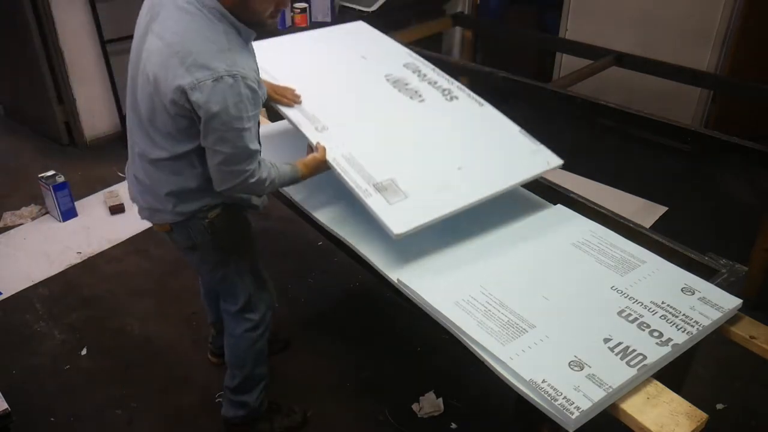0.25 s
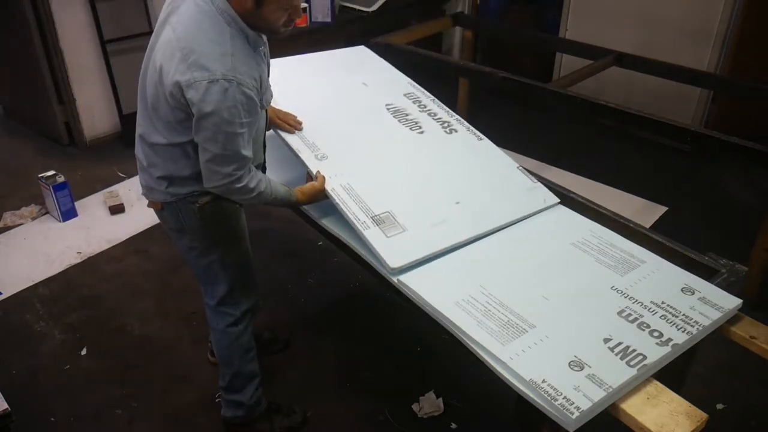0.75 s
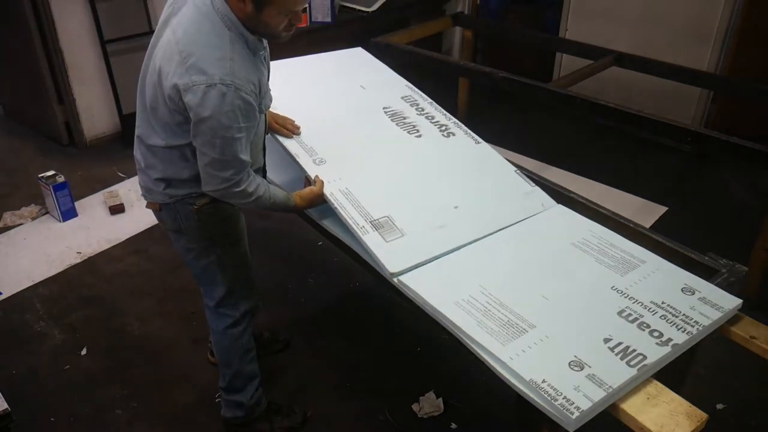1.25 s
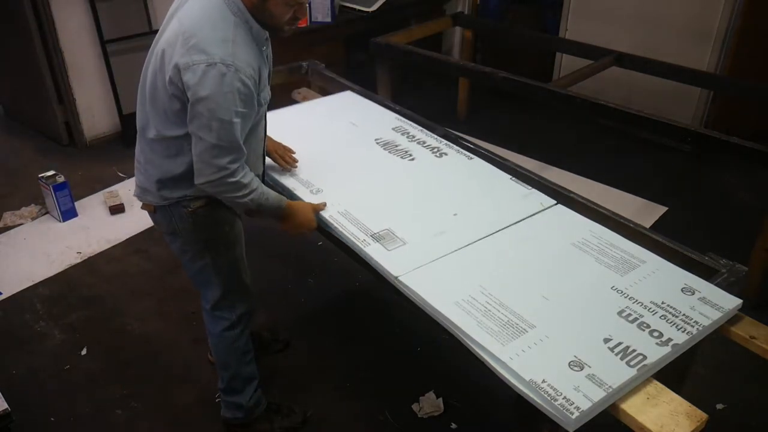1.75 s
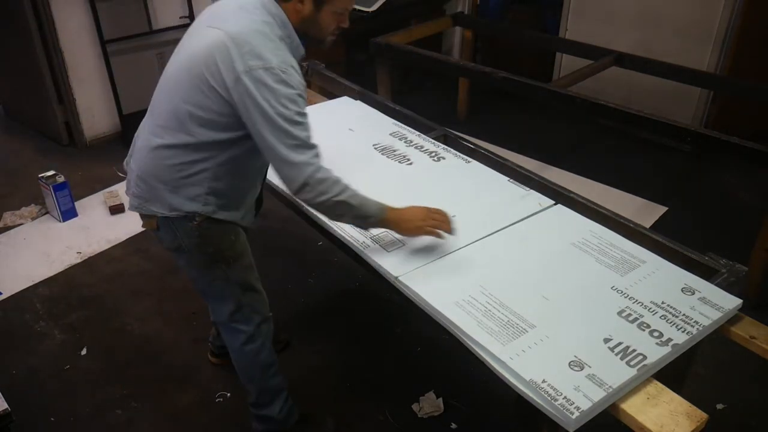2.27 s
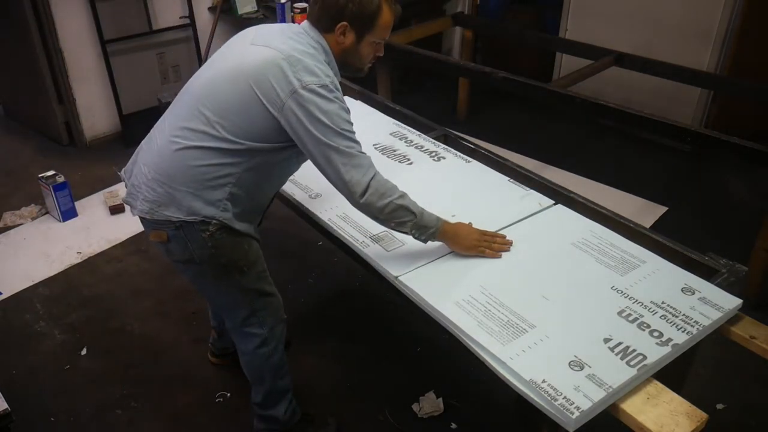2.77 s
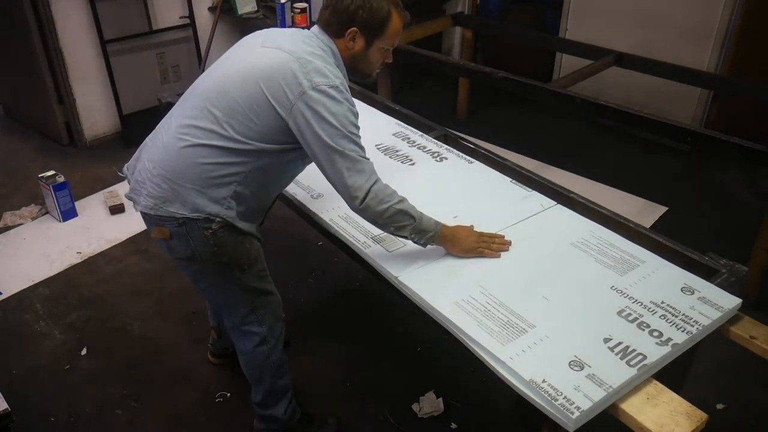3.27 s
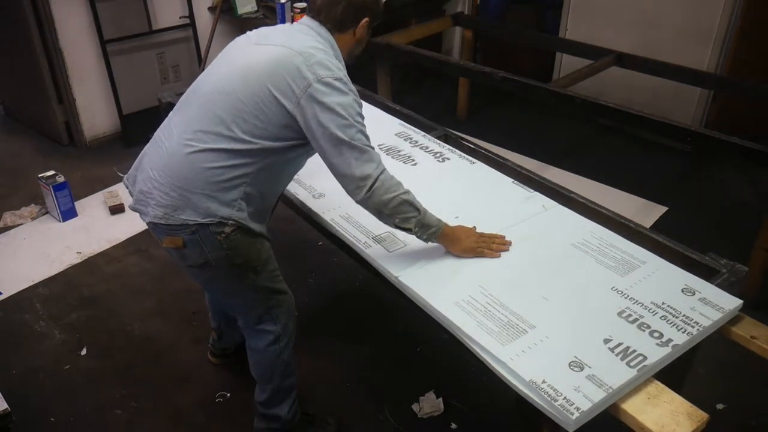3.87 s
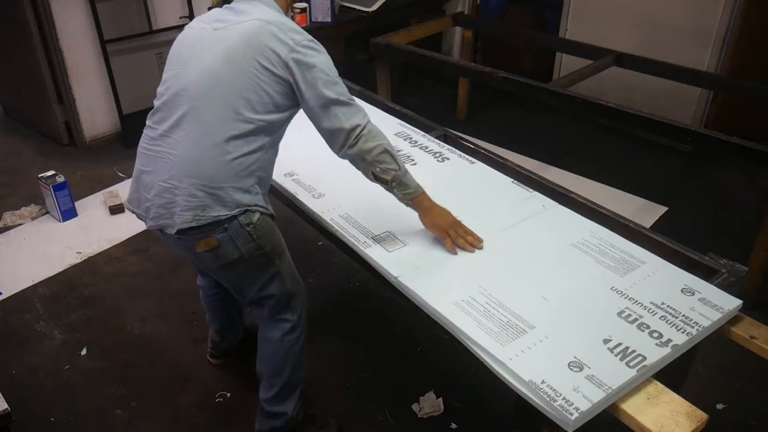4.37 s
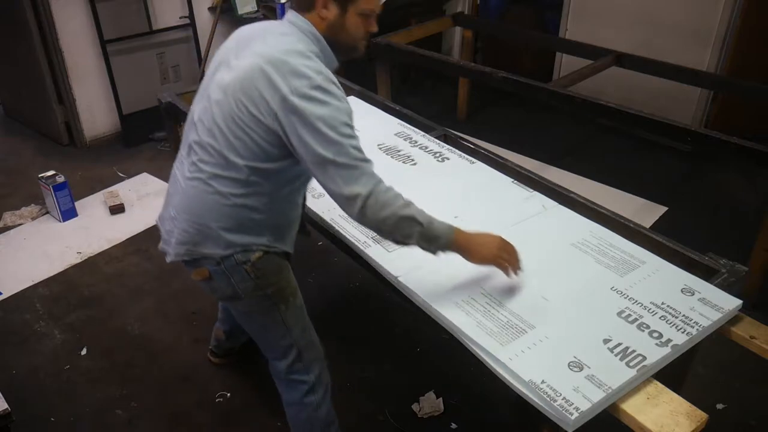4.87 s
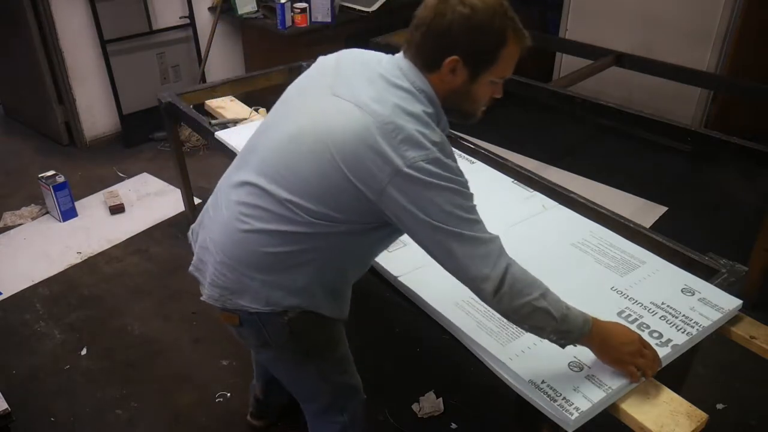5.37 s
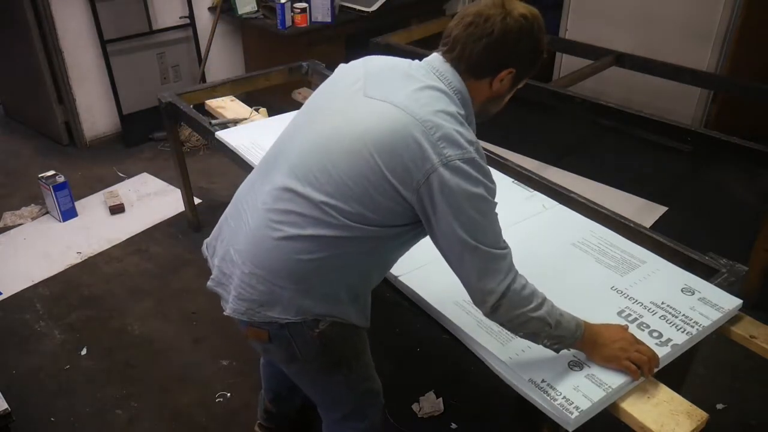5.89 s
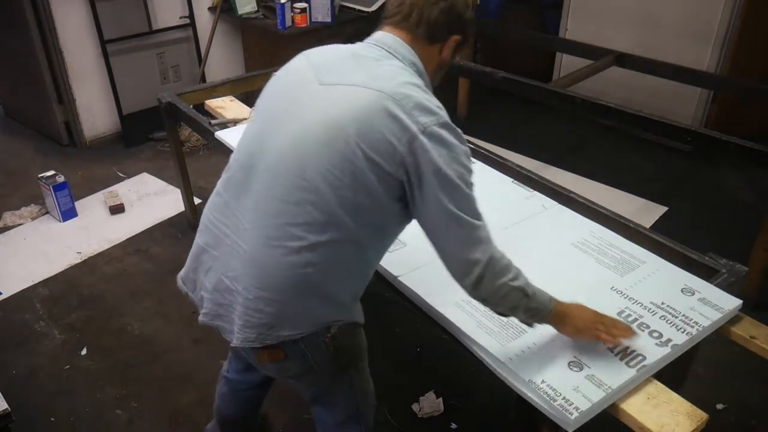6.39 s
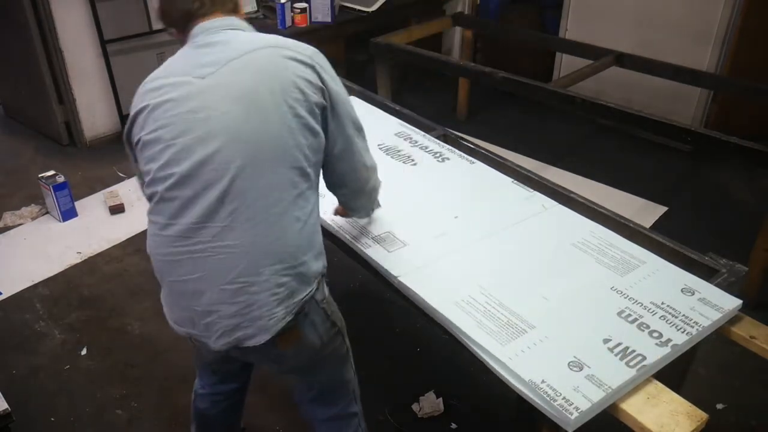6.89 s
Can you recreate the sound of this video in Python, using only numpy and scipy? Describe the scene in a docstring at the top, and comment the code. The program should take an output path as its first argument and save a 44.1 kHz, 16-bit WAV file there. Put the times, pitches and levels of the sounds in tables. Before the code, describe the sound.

A light rigid foam board scrapes and knocks onto another in an echoing workshop, then hand rubs, faint squeaks and a louder sliding bump.

```python
"""In a bare, echoing workshop a rigid foam board is laid on another, slid into place and rubbed by hand.
Grit between the faces slips in tiny jerks: random impulses that ring the resonances of the light panels.
Edges knock and push out trapped air, slips lock into short squeaks, and foam cells snap close by.
Dense echoes follow the board; a mains hum lies on quiet room noise. The two channels are almost the same."""
import sys
import numpy as np
from scipy import signal
from scipy.fft import rfft, irfft
from scipy.io import wavfile

SR = 44100
rng = np.random.default_rng(int(sys.argv[2]) if len(sys.argv) > 2 else 0)


def how_loud(loudness_db):
    """Turn decibels into a plain amplitude multiplier (0 dB gives 1, 20 dB gives 10)."""
    steps = np.asarray(loudness_db, float) / 20
    return 10 ** steps


def bounce(signal):
    """Save signal as a 16-bit WAV file at the path given by the first command-line argument."""
    frames = np.transpose(np.atleast_2d(signal))
    limited = np.clip(frames, -1, 1)
    pcm = np.round(limited * 32767).astype(np.int16)
    wavfile.write(sys.argv[1], SR, pcm)


N = 314874  # length in samples

# edges and palms landing: time_s, force_db, sharpness_db, edge_nearness_db, air_thump_db
KNOCKS = [(0.103, -45, -6, 6, -37.5), (0.557, -58.5, 18, 4, -52), (0.579, -50.5, 14, -17, -40),
          (0.597, -49, 1, -1, -33.5), (0.749, -41.5, -9, 30, -39.5), (0.966, -30, -17, 6, -43),
          (0.992, -43, -8, 4, -36.5), (1.189, -75, -7, -13, -49), (1.4, -44, -11, 3.5, -48),
          (1.696, -39.5, 5.5, -2.5, -40), (1.819, -53, -14, -11, -40.5), (2.064, -38, -21, -0.5, -64),
          (2.17, -31, 5.5, -1.5, -34), (3.923, -57, 6.5, -8, -40.5), (4.331, -57, 6, -1, -39),
          (5.379, -17.5, -29, 6.5, -49), (5.391, -45, -23, 15, -45), (6.23, -46, -2, 3, -50),
          (6.445, -38, 13, 39, -42)]
# rubs that swell and fade: peak_s, swell_s, strength_db, pressure_db, speed_db
RUBS = [(0.04, 0.9, -44.5, 3, 6.5), (0.155, 0.16, -33.5, 2.5, 10.5), (0.24, 0.26, -37.5, -12, -7),
        (0.47, 0.19, -50.5, 13.5, -2), (0.641, 0.23, -46, 9, 0), (0.75, 0.35, -49.5, 3.5, 12),
        (0.87, 0.13, -38.5, -0.5, 17.5), (1.424, 0.34, -47.5, -6, 5), (1.6, 0.22, -62.5, -20, 9),
        (1.701, 0.22, -41.5, 0, 6), (1.8, 0.27, -44, 0.5, 9), (1.896, 0.11, -44.5, -1.5, 10),
        (2.0, 0.22, -50, -6, -3), (2.08, .1, -43.5, -13, -3), (2.24, 0.38, -42.5, 0, 3.5),
        (2.62, 0.12, -50.5, -4, 1), (2.71, 0.22, -47.5, -7, 2), (2.94, 0.084, -58, -2, -7),
        (3.02, .15, -57, -3, 6), (3.24, .15, -61, 3.5, -4), (3.315, 0.2, -51.5, -2.5, 10),
        (3.614, 0.2, -43, -6.5, 3), (3.93, 0.14, -52, 1, 12), (4.035, 0.063, -34.5, 2.5, 4),
        (4.086, 0.21, -32.5, 2, 9), (4.22, 0.16, -48, 4.5, -8), (4.39, 0.61, -37.5, -1.5, 6),
        (4.54, 0.23, -39, 4.5, -5.5), (4.71, 0.17, -56, -2, 7), (4.86, 0.48, -50.5, 3.5, 15),
        (5.045, 0.27, -38, -3, 3.5), (5.2, .35, -26, -7, -6), (5.29, 0.28, -24, -4, -2),
        (5.39, .3, -24, -2.5, -9), (5.7, .2, -51, -2, 1), (6.201, 0.18, -50.5, -6, 5),
        (6.302, 0.13, -39.5, -3.5, 12), (6.798, 0.33, -34, 3, 3.5), (6.9, 0.22, -45, 0, -18),
        (7.13, 0.32, -46, -2.5, 2)]
# scrapes that grip at once: start_s, held_s, strength_db, pressure_db, speed_db
SCRAPES = [(0.101, 0.045, -21.5, 1, -15), (0.577, 0.024, -37.5, -10.5, 7), (0.968, 0.093, -62, 14.5, 4),
           (1.187, 0.018, -46, 4, 5.5), (4.944, 0.027, -42.5, -0.5, 6), (5.063, 0.098, -26.5, -6, -2),
           (6.415, 0.061, -23.5, 0.5, -2.5)]


def rms_one(x):
    """Normalisation: divides a signal by its root mean square."""
    return x / np.sqrt(np.mean(x ** 2) + 1e-20)


def drift(rate_hz):
    """Low-passed noise: two equal poles turn white noise into a slow random course of rms 1."""
    step = 40  # samples between points of the course
    r = np.exp(-2 * np.pi * rate_hz * step / SR)
    white = rng.standard_normal(N // step + 2002)
    slow = signal.lfilter([1], [1, -2 * r, r * r], white)[2000:]
    return np.interp(np.arange(N) / step, np.arange(len(slow)), rms_one(slow))


def coloured(spectrum):
    """Spectral shaping: white noise weighted in frequency by (Hz, dB) points, rms 1."""
    hz = np.arange(1, N // 2 + 2) * SR / N
    at_hz, db = np.transpose(spectrum)
    weight = how_loud(np.interp(np.log(hz), np.log(at_hz), db))
    return rms_one(irfft(rfft(rng.standard_normal(N)) * weight, N))


def resonate(x, modes, low_hz, high_hz):
    """Modal superposition: parallel resonances in a band; white input of rms 1 comes out at rms 1."""
    both = np.array([x + 1e-18, np.arange(N) == 0])  # the signal, and an impulse to find the gain
    band = signal.butter(2, [low_hz, high_hz], "band", fs=SR, output="sos")
    both = signal.sosfilt(band, both)
    out = 0
    for k, (hz, width_hz, db) in enumerate(modes):
        r = np.exp(-np.pi * width_hz / SR)
        poles = [1, -2 * r * np.cos(2 * np.pi * hz / SR), r * r]
        zeros = [(1 - r * r) / 2, 0, (r * r - 1) / 2]
        out = out + (-1) ** k * how_loud(db) * signal.lfilter(zeros, poles, both)
    sounded, response = out
    return sounded / np.sqrt(np.sum(response ** 2))


def background():
    """Stationary noise and a tone: room noise that wavers a little, and a hum at twice the mains rate."""
    # room noise spectrum: frequency_hz, relative_density_db
    air_spectrum = [(12, -36), (20, -2), (101, 0.5), (148, -4), (324, -12), (958, -13.5), (1130, -13),
                    (1450, -17), (3640, -22), (5690, -25.5), (8400, -32), (11100, -33), (15500, -37)]
    hum_hz = 100.5
    phase = 2 * np.pi * hum_hz * np.arange(N) / SR + 0.21 * drift(2.3)
    hum = how_loud(-64.5 + 3.3 * drift(0.62)) * np.sin(phase)
    air = how_loud(-54 + 2.1 * drift(32)) * coloured(air_spectrum)
    return air + hum


def slide_shapes():
    """Friction envelopes: each stroke's course in dB relative to its strength, one row a stroke."""
    t = np.arange(0, N + 64, 64) / SR

    # a rub is a rounded peak; its fall lasts 0.92 of its swell
    peak, swell = np.transpose(RUBS)[:2, :, None]
    away = np.where(t < peak, peak - t, (t - peak) / 0.92) / swell
    rounding = 0.086  # as a share of the swell
    rubs_db = -36 * (np.hypot(away, rounding) - rounding)

    # a scrape bites, holds, then slips away at 174 dB a second
    start, held = np.transpose(SCRAPES)[:2, :, None]
    grip_s = 0.0046 + 0.12 * held
    bite = np.clip((t - start) / grip_s, 1e-4, 1)
    scrapes_db = 20 * np.log10(bite) - 174 * np.maximum(t - start - held, 0)
    return t, np.vstack([rubs_db, scrapes_db])


def slides():
    """Friction excitation: pressure wakes the panel, speed raises the dust; one gain a resonance set."""
    # answers of boom, ring, rasp and hiss: level_db, pressure_share, speed_share, shape_steepness
    slide_law = [(-10, 1.3, 0.33, 1.07), (-3.5, 0.75, -.1, 0.93), (0.05, 0.0058, 0.018, 1.02),
                 (-13, -0.42, 0.8, 1.22)]
    t, shape_db = slide_shapes()
    strength, pressure, speed = np.transpose(RUBS + SCRAPES)[2:, :, None]
    gains = []
    for db, pressed, sped, steep in slide_law:
        stroke_db = db + strength + pressed * pressure + sped * speed + steep * shape_db
        gain = np.sqrt(np.sum(how_loud(stroke_db) ** 2, axis=0))  # strokes add in power
        gains.append(np.interp(np.arange(N) / SR, t, gain))
    return gains


def grit(per_s, spread_db, judder_db):
    """Stick-slip: random slips of uneven size that clump as the faces stick and let go, rms 1."""
    sizes = how_loud(spread_db * np.minimum(rng.exponential(1, N), 5)) * rng.choice([-1, 1], N)
    slips = sizes * (rng.random(N) < per_s / SR)
    judder = drift(33) + 0.09 * drift(2.1)
    return rms_one(slips * how_loud(judder_db * judder))


def blows(levels_db):
    """Impulsive excitation: one click at each knock time."""
    train = np.zeros(N)
    train[[round(row[0] * SR) for row in KNOCKS]] = how_loud(levels_db)
    return train


def contact_force(levels_db, rise_s, fall_s):
    """Contact mechanics: each blow becomes a force that builds up and dies away exponentially."""
    rise, fall = np.exp(-1 / (np.array([rise_s, fall_s]) * SR))
    return signal.lfilter([1 - rise], np.convolve([1, -rise], [1, -fall]), blows(levels_db))


def air_cushion(levels_db):
    """Volume displacement: air trapped under the board is pushed out in one soft pulse a knock."""
    # thump resonances: frequency_hz, width_hz, level_db
    thump_modes = [(106, 40, -8.5), (146, 33, -3), (184, 41, -3), (325, 360, -5.5)]
    escape_s = 0.0026
    pulse = 4.83 * np.hanning(round(escape_s * SR)) / np.sqrt(escape_s * SR)
    return resonate(np.convolve(blows(levels_db), pulse)[:N], thump_modes, 43, 430)


def board():
    """Source and resonator: sliding and the crunch of knocks feed slips into four sets of resonances."""
    # panel and dust resonances, low to high: frequency_hz, width_hz, level_db
    boom_modes = [(299, 650, -9.5), (417.5, 63, -3), (658, 114, -4.5)]
    ring_modes = [(785, 90, -3), (1064.4, 166, -2.5), (1147, 152, 1), (1520, 870, -8.5)]
    rasp_modes = [(1750, 255, 1), (1970, 1710, -1.5), (2693, 627, 2), (3524, 740, -2), (4130, 1276, -3),
                  (5110, 1034, -7)]
    hiss_modes = [(6580, 1800, -0.5), (9940, 2200, 2.5), (13100, 11000, -6.5)]
    # answers of boom, ring, rasp and hiss to a knock: level_db, sharpness_share, edge_nearness_share
    knock_law = [(-0.3, 0.045, -0.81), (-1.1, 0.045, 0.18), (1.4, 0.93, -0.26), (-20, 2.56, -0.4)]

    force_db, sharpness, edge, thump_db = np.transpose(KNOCKS)[1:]
    crunch_db = [db + force_db + keen * sharpness + near * edge for db, keen, near in knock_law]
    coarse = grit(4000, 5.33, 0.54)
    # modes, low_hz, high_hz, knock rise_s and fall_s, knock hardness 0-1, slips
    voices = [(boom_modes, 280, 800, .004, .016, .1, coarse),
              (ring_modes, 700, 1550, .003, .014, .1, coarse),
              (rasp_modes, 1450, 8000, .0006, .010, .9, grit(8000, 2.6, 0.98)),
              (hiss_modes, 5000, 17000, .0003, .008, .4, grit(15000, 3.1, 1.34))]
    out = air_cushion(thump_db)
    for voice, slide, crunch in zip(voices, slides(), crunch_db):
        modes, low_hz, high_hz, rise_s, fall_s, hard, slips = voice
        rubbing = slide * slips
        force = contact_force(crunch, rise_s, fall_s)
        # a knock is a harder contact than a rub: sharper slips, same strength at mid band
        middle_hz = np.sqrt(low_hz * high_hz)
        at_middle = abs(1 - hard * np.exp(-2j * np.pi * middle_hz / SR))
        sharp = signal.lfilter([1, -hard], [at_middle], slips)
        out = out + resonate(rubbing + force * sharp, modes, low_hz, high_hz)
    return out


def squeaks():
    """Phase-locked stick-slip: slips lock to one rate, a short tone that wavers in pitch and flickers."""
    # skin and foam squeaking: start_s, length_s, start_hz, end_hz, level_db
    squeak_rows = [(0.082, 0.028, 1075, 1150, -30.5), (1.195, 0.027, 2970, 2960, -46.5),
                   (1.363, 0.037, 2980, 2920, -44.5), (1.394, 0.02, 587, 547, -44),
                   (2.172, 0.11, 1204, 1237, -39), (2.19, 0.24, 1310, 1271, -45.5),
                   (3.802, 0.088, 1143, 1050, -49), (3.902, 0.1, 2930, 2990, -48),
                   (3.885, 0.078, 4350, 4360, -54), (3.928, 0.16, 768, 1030, -42.5),
                   (5.2, 0.12, 1180, 1196, -26)]
    out = np.zeros(N)
    waver = 1 + .025 * drift(70)
    flicker = how_loud(4 * drift(50))
    for s, length_s, hz, end_hz, db in squeak_rows:
        i, n = round(s * SR), round(length_s * SR)
        pitch_hz = np.linspace(hz, end_hz, n) * waver[i:i + n]
        phase = 2 * np.pi * np.cumsum(pitch_hz) / SR
        out[i:i + n] += how_loud(db) * signal.windows.tukey(n, .6) * np.sin(phase)
    return out * flicker


def workshop(x, count=6):
    """Diffuse reverberation: dense echoes build up fast and decay by band; one more for the stereo difference."""
    # reverberation time: frequency_hz, t60_s
    room_t60 = [(120, 0.84), (500, 0.71), (1500, 0.71), (4000, 0.59), (10000, 0.5), (15000, 0.41)]
    t = np.arange(SR) / SR
    edges_hz = 40 * 2 ** np.arange(0, 9.1, .5)
    at_hz, t60 = np.transpose(room_t60)
    white = rng.standard_normal((count + 1, SR))
    tail = 0
    for low, high in zip(edges_hz, edges_hz[1:]):
        sos = signal.butter(2, [low, min(high, .45 * SR)], "band", fs=SR, output="sos")
        decay_s = np.interp(np.log(low * high) / 2, np.log(at_hz), t60)
        tail = tail + signal.sosfilt(sos, white) * how_loud(-60 * t / decay_s) / np.sqrt(decay_s)
    build_up_s = 0.0027
    tail = tail * np.sqrt(1 - np.exp(-t / build_up_s))
    tail = tail / np.sqrt(np.sum(tail ** 2, axis=1, keepdims=True))
    wall_dull = 0.47  # walls and air keep back the treble
    tail = signal.lfilter([1 - wall_dull], [1, -wall_dull], tail)

    # the contact wanders over the board, so the echo pattern fades from one place to the next
    wander_s = .1
    place = (np.arange(N) / SR / wander_s - np.arange(count)[:, None]) % count - 1
    share = np.cos(np.pi / 2 * np.clip(place, -1, 1))
    echoes = signal.fftconvolve(np.vstack([share * x, x]), tail, axes=1)[:, :N]
    return echoes[:-1].sum(axis=0), echoes[-1]


def snaps():
    """Damped oscillation: a click rings two or three cycles, too near to wake the room."""
    # dry snaps of foam cells near the microphone: time_s, level_db, ring_hz
    snap_rows = [(2.5742, -38, 1410), (3.525, -36.5, 9000), (4.815, -22, 4420), (5.921, -38, 1215),
                 (6.198, -31.5, 10500), (6.631, -29, 8800), (7.029, -36, 8000)]
    out = np.zeros(N)
    t = np.arange(200) / SR
    for s, db, hz in snap_rows:
        burst = np.cos(2 * np.pi * hz * t) * np.exp(-t * hz / 1.2)
        i = round(s * SR)
        out[i:i + 200] += how_loud(db) * (burst - burst.mean())
    return out


def scene():
    """Mid-side superposition: sources in the middle; a faint, dull stereo difference, its level varied at random."""
    # steady noise of the stereo difference: frequency_hz, relative_density_db
    side_spectrum = [(20, 2), (300, -5.5), (800, -10), (2000, -30), (6000, -26), (15500, -12.5)]
    contact = board() + squeaks()
    echoes, wide = workshop(contact)
    mid = how_loud(-3) * contact + echoes + snaps() + background()
    wide = signal.lfilter(*signal.butter(1, 1440, fs=SR), wide)  # dull: low-pass at 1440 Hz
    wide = how_loud(-30.5 + 9.5 * drift(10.8)) * wide
    side_noise = how_loud(-74 + 7.4 * drift(4.8)) * coloured(side_spectrum)
    side = wide + side_noise
    return np.array([mid + side, mid - side])


def top_cut(x):
    """Nothing passes above the cut-off."""
    return signal.sosfilt(signal.butter(12, 16510, fs=SR, output="sos"), x)


def record(dry):
    """Band limiting: a steep low-pass, 50 dB down from 16400 Hz, finishes the mix."""
    steep_cut = signal.cheby2(10, 50, 16400, fs=SR, output="sos")
    finished = signal.sosfilt(steep_cut, dry)
    return top_cut(finished)


dry = scene()
out = record(dry)
bounce(out)
```